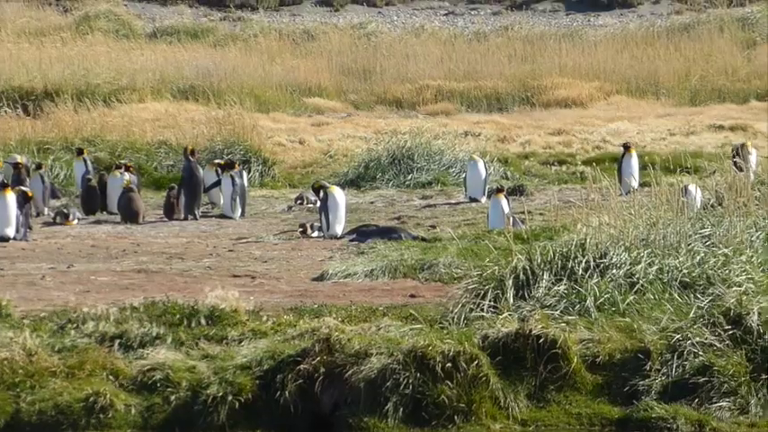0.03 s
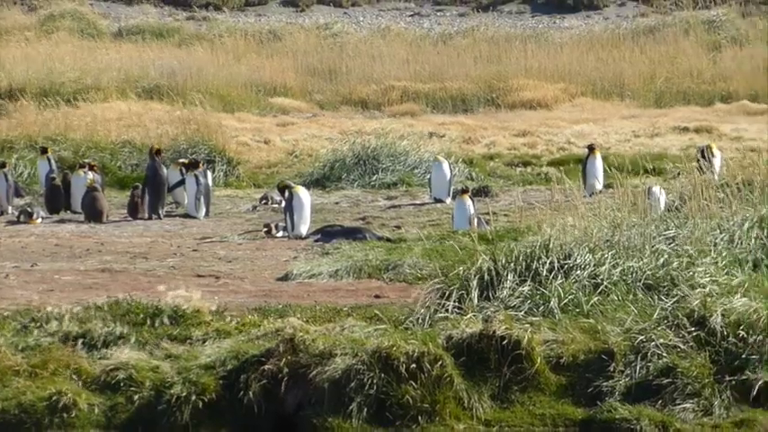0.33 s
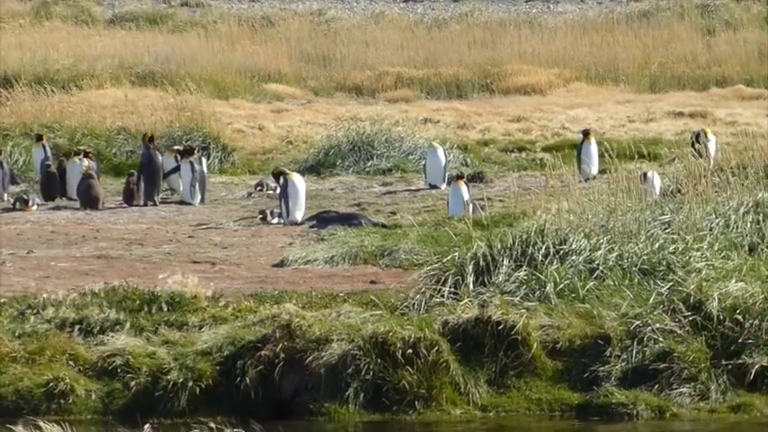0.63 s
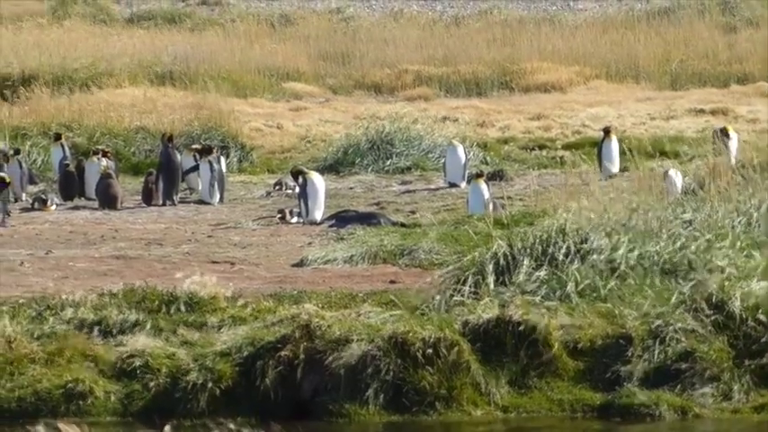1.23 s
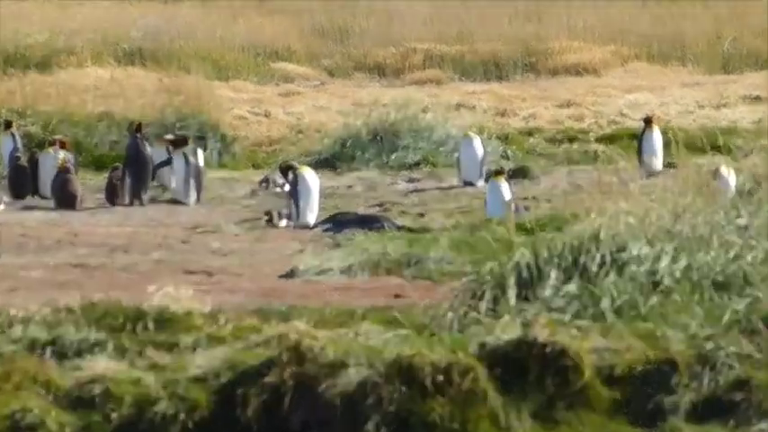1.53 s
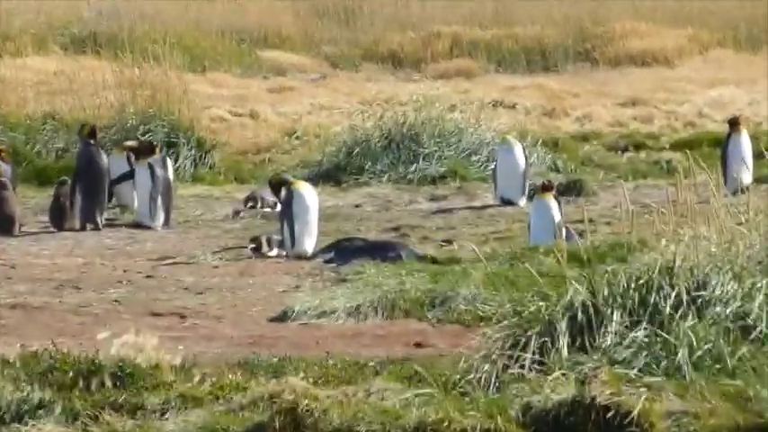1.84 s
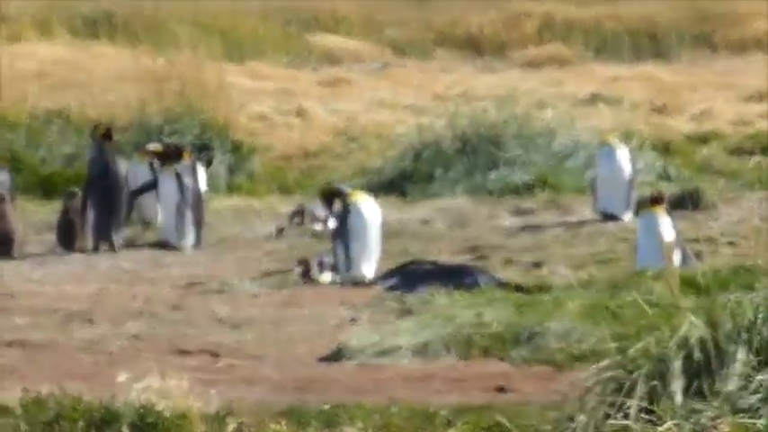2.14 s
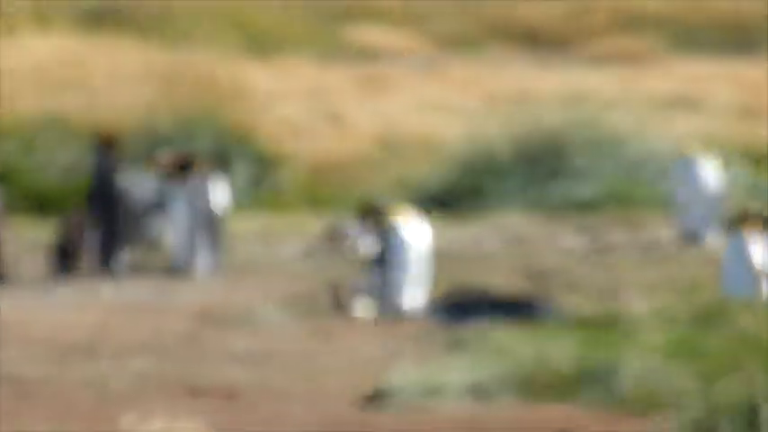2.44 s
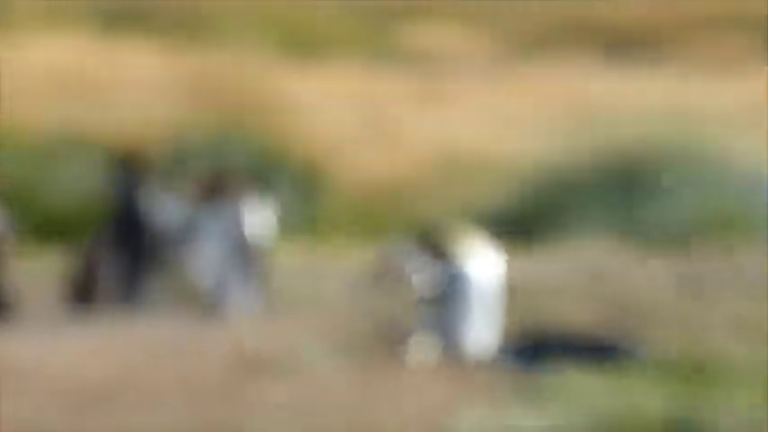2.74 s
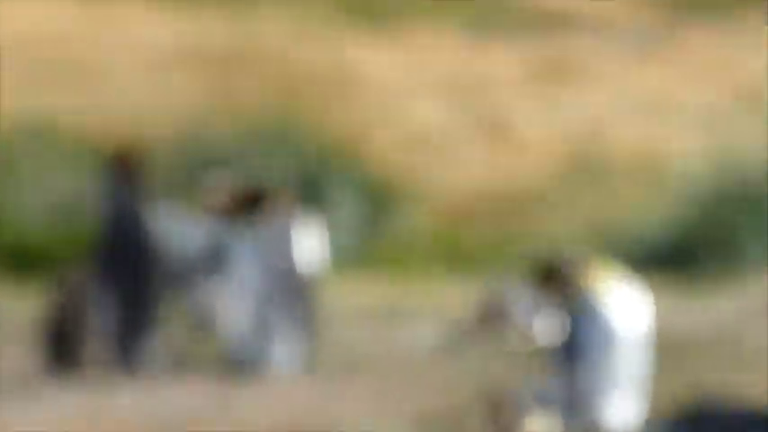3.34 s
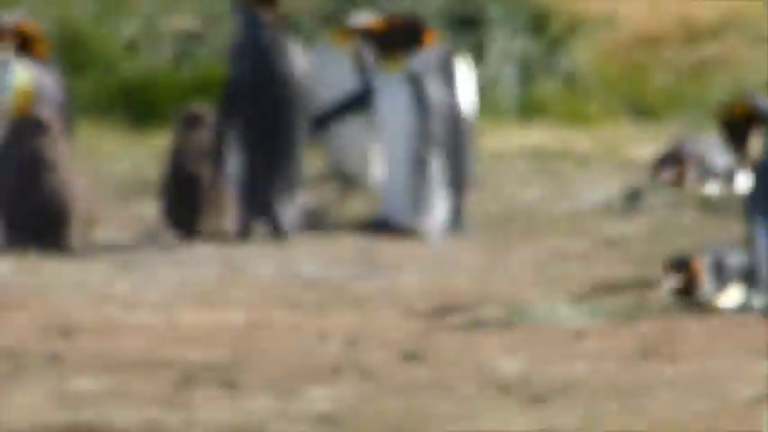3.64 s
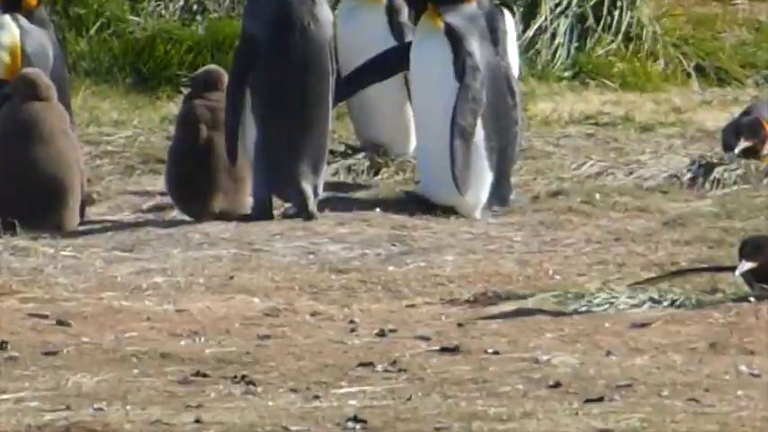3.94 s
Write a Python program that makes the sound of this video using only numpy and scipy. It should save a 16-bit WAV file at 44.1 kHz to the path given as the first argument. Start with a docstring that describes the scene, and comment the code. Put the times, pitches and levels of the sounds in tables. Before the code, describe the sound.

Gusty wind buffets the microphone with a low rumble, fluttering roar and hiss.

```python
"""Gusty wind on a camera microphone

Wind on open grassland cuts in abruptly, blowing across a camera's two microphone openings (ports).
Swirls of air, called eddies, buffet each port with a low rumble; a fluttering roar and a hiss rush
over both. Brief crackles break through, and single strong eddies thump and overload the input.
The handled camera ticks now and then, and its lens zooms with a faint hiss."""
import sys
import numpy as np
from scipy import signal
from scipy.fft import rfft, irfft
from scipy.io import wavfile
from scipy.ndimage import uniform_filter1d

SR = 44100
rng = np.random.default_rng(int(sys.argv[2]) if len(sys.argv) > 2 else 0)


def dump(signal):
    """Clip the signal to [-1, 1] and save it as 16-bit WAV at the path in sys.argv[1]."""
    limited = np.clip(np.atleast_2d(signal).T, -1, 1)
    pcm = np.round(limited * 32767).astype(np.int16)
    wavfile.write(sys.argv[1], SR, pcm)


N = 176400

# How the rumble swells and shifts sides: time_s, relative_level_db, left_minus_right_db
RUMBLE_GUSTS = [(0.46, -20, 10), (0.56, -19, 5.5), (0.6, -21.5, 10), (0.635, -18.5, 2), (0.79, -21.5, 4.5),
                (0.82, -18, -11.5), (0.855, -25, -9), (0.905, -16.5, -6.5), (0.945, -29, 1),
                (0.98, -20.5, -0.5), (1.07, -20, 2), (1.11, -18, -6.5), (1.22, -24.5, -5),
                (1.28, -22.5, -6), (1.59, -19.5, 0), (1.66, -24.5, -4), (1.72, -24, 2.5), (1.89, -21, 5.5),
                (1.92, -24, 2), (2.0, -20, -5), (2.1, -23.5, 1), (2.35, -20, 1), (2.41, -18.5, -4),
                (2.44, -28.5, 0), (2.46, -21, 0.5), (2.55, -18.5, 0), (2.62, -24, -2.5), (2.67, -17.5, -4),
                (2.71, -24, 2), (2.78, -23, 7.5), (2.82, -20.5, -10), (2.87, -26.5, 4), (3.0, -27, 0),
                (3.09, -21.5, 10.5), (3.14, -25, 8), (3.2, -19, 9), (3.27, -18, -10.5), (3.35, -26, 12),
                (3.46, -25.5, 4.5), (3.6, -18.5, -5), (3.7, -21, -3.5), (3.85, -21, -1), (3.885, -27, 17),
                (3.96, -20.5, 3.5)]
# How the roar and the hiss swell and fade: time_s, relative_level_db
ROAR_GUSTS = [(0.46, -29.5), (0.54, -24.5), (0.82, -23.5), (0.85, -34), (0.88, -29), (0.95, -31),
              (1.05, -23), (1.075, -45), (1.1, -22.5), (1.19, -32.5), (1.29, -26), (1.32, -38), (1.36, -30),
              (1.39, -41), (1.42, -24), (1.45, -43.5), (1.505, -23), (1.55, -29.5), (1.7, -30), (1.92, -30),
              (2.25, -30.5), (2.3, -28.5), (2.5, -30.5), (2.55, -31), (2.87, -30), (3.08, -27), (3.26, -29),
              (3.33, -29), (3.66, -25), (3.75, -29), (3.78, -21.5), (3.87, -36), (4.0, -26.5)]
HISS_GUSTS = [(0.46, -41), (0.6, -44), (0.74, -40.5), (0.81, -44), (0.84, -49.5), (1.07, -54),
              (1.15, -45.5), (1.18, -51), (1.46, -52.5), (1.51, -44), (1.58, -50), (1.6, -42.5),
              (1.72, -54.5), (1.73, -43), (1.83, -42), (1.86, -51.5), (1.89, -42), (1.96, -54.5),
              (2.0, -47), (2.1, -53.5), (2.18, -45), (2.24, -52), (2.27, -45.5), (3.01, -50.5), (3.05, -41),
              (3.22, -48.5), (3.45, -42.5), (3.5, -50), (3.75, -49), (3.78, -48.5), (3.86, -52), (4.0, -44)]
# The tone of each noise, from bass to treble: frequency_hz, relative_level_db
RUMBLE_TONE = [(20, -31), (44, -35), (62, -23), (95, -9), (170, -2), (290, 0), (420, -2), (600, -8.5),
               (1000, -21), (2000, -34), (5000, -68), (16000, -92)]
ROAR_TONE = [(100, -37), (300, -11.5), (500, -0.5), (750, 1.5), (1100, -5.5), (1600, -14), (2500, -22.5),
             (5000, -46), (16000, -92.5)]
HISS_TONE = [(300, -11.5), (1000, 9.5), (2000, 5.5), (3200, 1.5), (5000, -8.5), (7000, -18.5), (8650, -25),
             (9100, -42), (9600, -29.5), (11000, -35.5), (13000, -46), (16000, -48.5)]
CRACKLE_TONE = [(500, -12), (1500, 5.5), (4000, -2), (8000, -14.5), (15500, -42)]
ZOOM_TONE = [(6000, -29), (9800, 2), (11200, -1), (12200, 0), (13000, -14), (16000, -23.5)]
# How alike the two ports rumble: frequency_hz, likeness (1 the same, 0 unrelated, -1 opposite)
RUMBLE_LIKENESS = [(60, -0.09), (100, 0.74), (170, -0.02), (330, 0.07), (600, -0.013), (1200, -0.7)]
# How far the right port's wave trails the left's in roar and hiss: frequency_hz, lag_radians
PORT_LAG = [(300, 3.78), (860, 3.08), (2000, 3.497), (5800, 4.91), (15000, 5.55)]
# Brief, bright crackles: middle_s, level_db, half_width_s
CRACKLES = [(.446, -28.5, .0015), (0.492, -34, 0.0048), (0.734, -30.5, 0.0084), (0.819, -36, 0.0036),
            (.830, -37, .0015), (1.093, -35, 0.0011), (1.155, -32, .001), (1.603, -32, .0012),
            (1.822, -31, 0.0055), (2.18, -32, 0.0032), (2.576, -38, 0.0012), (3.635, -36, 0.0019),
            (3.78, -38, 0.0032)]
# Single strong eddies: start_s, strength_db, left_minus_right_db, pitch_hz
STRONG_EDDIES = [(0.81, -6.5, 0, 143), (0.816, -1.5, -15, 410), (0.828, -2.5, -17, 344),
                 (1.091, -1, -9, 594), (1.1, -5, -7, 250), (1.1531, -3.5, -16, 380), (1.415, -8.5, -5, 600),
                 (1.501, -5, -9, 510), (1.604, -11.5, -11, 1480), (1.663, -7, -16, 305),
                 (2.399, -4, 3, 283), (2.456, -7.5, 2, 188), (2.673, -11.5, -7, 181),
                 (2.811, -3.5, -2, 316), (2.951, -9, -4, 265), (3.082, -8, 0, 307), (3.201, -5.5, 14, 323),
                 (3.634, -5.5, -14, 374), (3.778, -11, 4, 244)]
# Ticks of the handled camera: start_s, level_db
CAMERA_TICKS = [(1.088, -44), (2.369, -52), (3.957, -36.5)]


def amp(db):
    """Turns decibels into a number to multiply a sound by."""
    return 10 ** (np.asarray(db) / 20)


def unit(x):
    """Scales a signal so that its average strength (rms) is 1."""
    return x / np.sqrt(np.mean(x ** 2) + 1e-20)


def over_time(table, column=1):
    """Joins a table's points with lines, giving a value for every sample."""
    rows = np.array(table)
    return np.interp(np.arange(N) / SR, rows[:, 0], rows[:, column])


def over_hz(table):
    """Joins a table's points, giving a value for every frequency."""
    hz, value = np.transpose(table)
    return np.interp(np.log(np.fft.rfftfreq(N, 1 / SR) + 1), np.log(hz), value)


def pan(db):
    """Left and right gains that keep the total power; positive db leans left."""
    gains = amp(np.array([db, -db]).reshape(2, -1) / 2)
    return gains / np.sqrt((gains ** 2).mean(0))


def wobble(low_hz, high_hz, limit=3.7):
    """A random wobble, mostly between two speeds, with its biggest swings softened."""
    hz = np.fft.rfftfreq(N, 1 / SR) + 1e-6
    shape = 1 / np.sqrt(hz * (1 + (low_hz / hz) ** 4) * (1 + (hz / high_hz) ** 4))
    drift = unit(irfft(rfft(rng.standard_normal(N)) * shape, N))
    return limit * np.tanh(drift / limit)


def with_tone(x, tone):
    """Filters a noise to follow a tone table, at strength 1."""
    log_gain = np.log(amp(over_hz(tone)))
    mirrored = np.concatenate([log_gain, log_gain[-2:0:-1]])
    # This makes the filter ring only after a sound, never before it.
    response = np.exp(np.conj(signal.hilbert(mirrored)))[:len(log_gain)]
    return unit(irfft(rfft(x) * response, N))


def patchy(x, depth_db, patch_s=0.054, patch_hz=217):
    """Lumps of swirling air lift or lower random pitches for a moment, alike at both ports."""
    spectra = signal.stft(x, nperseg=512, noverlap=384)[2]
    patches = rng.standard_normal(spectra.shape[:0:-1])
    for axis, width in enumerate([patch_s * SR / 128, patch_hz * 512 / SR]):  # blur time, then pitch
        count = patches.shape[axis]
        blur = np.exp(-(np.pi * np.fft.rfftfreq(count) * width / 2) ** 2)
        patches = irfft(rfft(patches, axis=axis) * np.expand_dims(blur, 1 - axis), count, axis=axis)
    spectra = spectra * amp(depth_db * unit(patches).T)
    return signal.istft(spectra, nperseg=512, noverlap=384)[1][:, :N]


def steadied(x, window_samples):
    """Takes slow swells out of a noise and keeps its fast flutter."""
    return x / np.sqrt(uniform_filter1d((x ** 2).mean(0), window_samples) + 1e-9)


def across_ports(noise, likeness):
    """Makes the right port's noise a partial, lagging copy of the left's."""
    left, other = noise
    right = likeness * left + np.sqrt(1 - likeness ** 2) * other
    lag = np.exp(-1j * over_hz(PORT_LAG))
    return np.array([left, irfft(rfft(right) * lag, N)])


def add(mix, start_s, sound):
    """Adds a stereo sound to the mix at the given time."""
    part = mix[:, round(start_s * SR):][:, :sound.shape[1]]
    part += sound[:, :part.shape[1]]


def rumble(flutter, flutter_db=2.0, lumps_db=2.0, boost_db=3):
    """Eddies buffet the ports with low, lumpy pressure swings, partly separate at each one."""
    lumps = np.array([wobble(12, 73), wobble(14, 92)])
    a, b = rfft(rng.standard_normal((2, N)) * amp(flutter_db * flutter + lumps_db * lumps))
    # Blending two noises into each other sets how alike the ports sound.
    angle = np.arcsin(over_hz(RUMBLE_LIKENESS)) / 2
    own, shared = np.cos(angle), np.sin(angle)
    ports = irfft(np.array([a * own + b * shared, b * own + a * shared]), N)
    air = patchy(with_tone(ports, RUMBLE_TONE), depth_db=3.0)
    air = steadied(air, window_samples=2000)
    return air * amp(boost_db + over_time(RUMBLE_GUSTS)) * pan(over_time(RUMBLE_GUSTS, column=2))


def roar(flutter, flutter_db=1.5, boost_db=5.5, left_db=2, lean=0.26):
    """Air tumbles over the ports in a fluttering roar that leans to the side buffeted harder."""
    noise = rng.standard_normal((2, N)) * amp(flutter_db * flutter)
    ports = across_ports(noise, likeness=0.88)
    air = patchy(with_tone(ports, ROAR_TONE), depth_db=1.5)
    air = steadied(air, window_samples=2000)
    side_db = left_db + lean * over_time(RUMBLE_GUSTS, column=2)
    return air * amp(boost_db + over_time(ROAR_GUSTS)) * pan(side_db)


def hiss(flutter, flutter_db=3.5, sputter_db=3.5, boost_db=10, treble_hz=5470, brighten=0.42):
    """Tiny swirls of air make a sputtering hiss that gets brighter as it gets louder."""
    noise = rng.standard_normal((2, N)) * amp(flutter_db * flutter + sputter_db * wobble(50, 940))
    ports = across_ports(noise, likeness=0.79)
    air = patchy(with_tone(ports, HISS_TONE), depth_db=0.9)
    air = steadied(air, window_samples=3000)
    gust_db = over_time(HISS_GUSTS)
    treble = signal.sosfiltfilt(signal.butter(2, treble_hz, "highpass", fs=SR, output="sos"), air)
    treble_gain = amp(brighten * (gust_db - np.median(gust_db)))
    return (air - treble + treble * treble_gain) * amp(boost_db + gust_db)


def crackles():
    """Brief, bright crackles from spitting air, the input overloading and the sound cutting in."""
    t = np.arange(N) / SR
    bursts = sum(amp(db) * np.exp(-((t - middle_s) / half_width_s) ** 2)
                 for middle_s, db, half_width_s in CRACKLES)
    return bursts * with_tone(rng.standard_normal((2, N)), CRACKLE_TONE)


def thumps(rise_cycles=0.31, decay_cycles=1, pitch_drop=0.08, opposite_hz=805, low_cut_hz=90):
    """Each strong eddy gives a short pressure swing that slows as it dies away."""
    out, t = np.zeros((2, N)), np.arange(2048) / SR
    for start_s, db, side_db, hz in STRONG_EDDIES:
        cycles = hz * t
        dying = np.exp(-cycles / decay_cycles)
        swell = (1 - np.exp(-(cycles / rise_cycles) ** 2)) * dying
        falling_hz = hz * (1 - pitch_drop * (1 - dying))
        phase = 2 * np.pi * np.cumsum(falling_hz) / SR
        lag = np.pi * min(hz / opposite_hz, 1)  # small, quick eddies push the ports opposite ways
        swing = swell / swell.max() * np.sin([phase, phase - lag])
        add(out, start_s, amp(db) * pan(side_db) * swing)
    return signal.sosfilt(signal.butter(2, low_cut_hz, "highpass", fs=SR, output="sos"), out)


def handling_ticks(decay_s=0.0011):
    """The handled camera body gives tiny dry ticks, each a burst of noise that dies fast."""
    out, t = np.zeros((2, N)), np.arange(1024) / SR
    for start_s, db in CAMERA_TICKS:
        add(out, start_s, amp(db) * np.exp(-t / decay_s) * rng.standard_normal((2, len(t))))
    return out


def zoom_motor(start_s=1.55, end_s=2.98, fade_s=0.15, level_db=-76, scratch_db=3.0):
    """The lens motor makes a thin, faint, scratchy hiss while it runs."""
    t = np.arange(N) / SR
    running = np.clip(np.minimum(t - start_s, end_s - t) / fade_s, 0, 1)
    scratchy_gain = amp(level_db + scratch_db * wobble(10, 200))
    return scratchy_gain * running * with_tone(rng.standard_normal((2, N)), ZOOM_TONE)


def scene():
    """Adds wind and camera sounds; one flutter of the air shakes the rumble, roar and hiss together."""
    flutter = wobble(2.5, 240)
    wind = rumble(flutter) + roar(flutter) + hiss(flutter)
    return wind + crackles() + thumps() + zoom_motor() + handling_ticks()


def record(dry, start_s=0.443, fade_in_s=0.0015, high_cut_hz=15900):
    """The input opens abruptly, flattens peaks that overload it and cuts the highest treble."""
    opened = np.clip((np.arange(N) / SR - start_s) / fade_in_s, 0, 1)
    clipped = np.clip(dry * opened, -1, 1)
    low_pass = signal.firwin(511, high_cut_hz, window=("kaiser", 9), fs=SR)
    return signal.oaconvolve(clipped, low_pass[None], "same")


dry = scene()
out = record(dry)
dump(out)
```